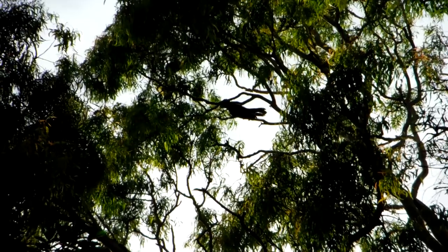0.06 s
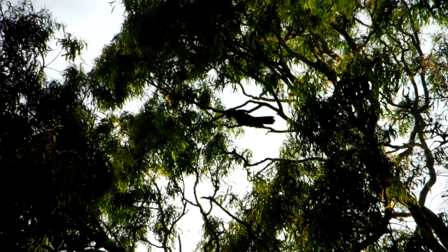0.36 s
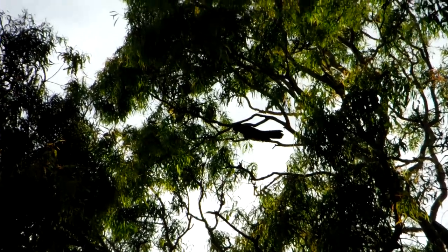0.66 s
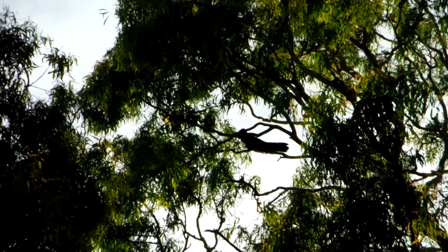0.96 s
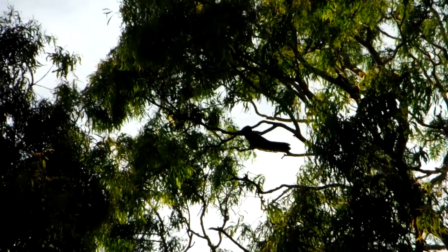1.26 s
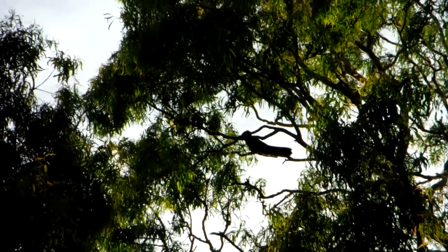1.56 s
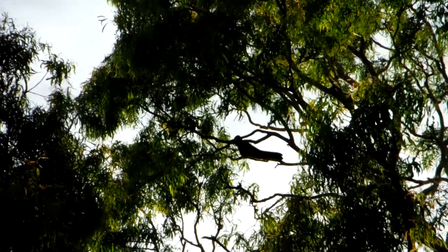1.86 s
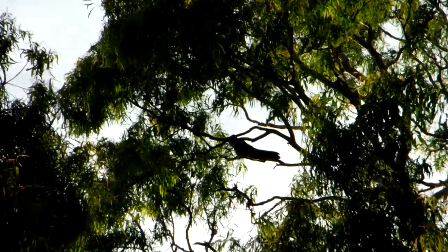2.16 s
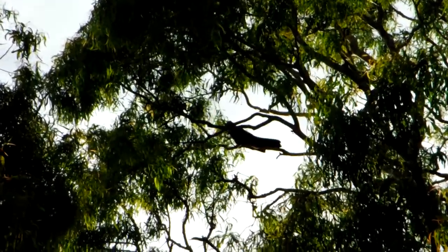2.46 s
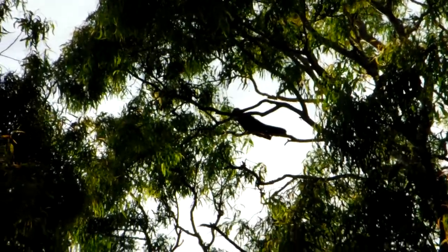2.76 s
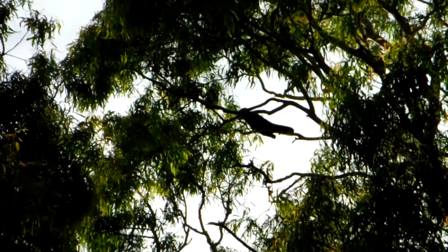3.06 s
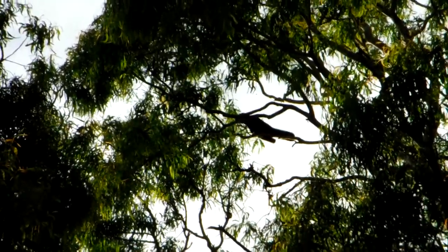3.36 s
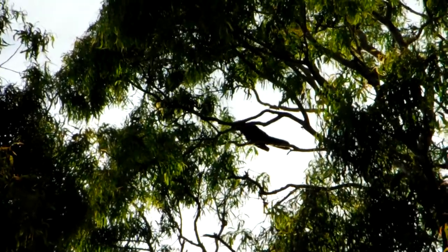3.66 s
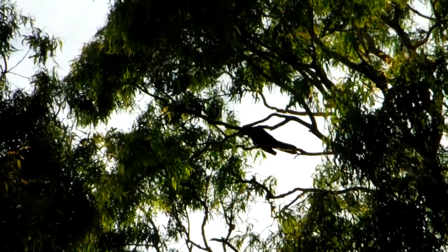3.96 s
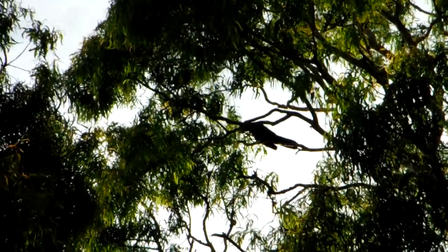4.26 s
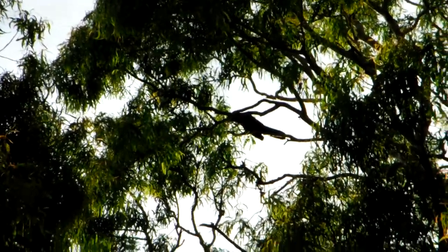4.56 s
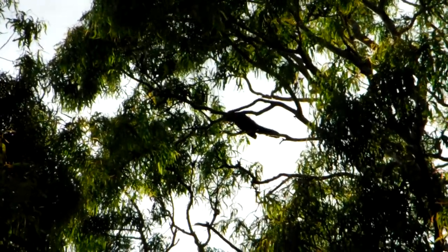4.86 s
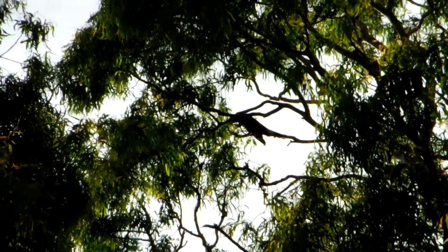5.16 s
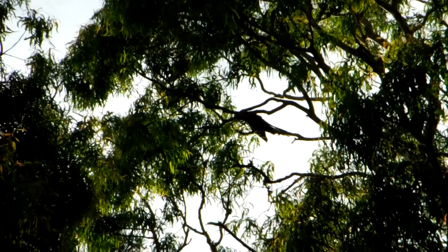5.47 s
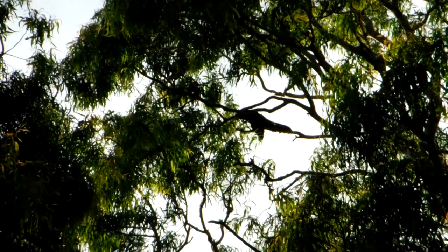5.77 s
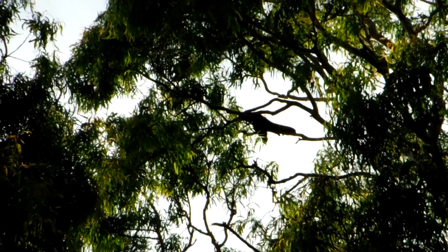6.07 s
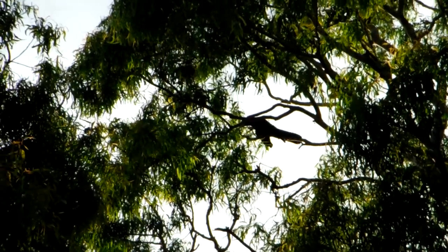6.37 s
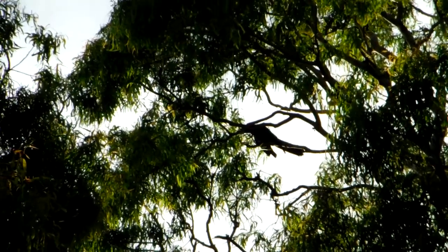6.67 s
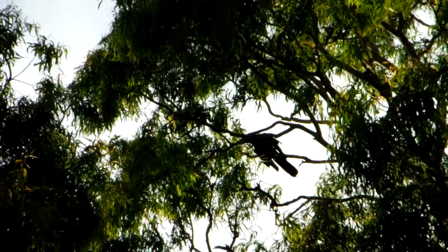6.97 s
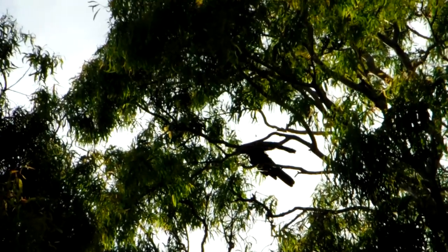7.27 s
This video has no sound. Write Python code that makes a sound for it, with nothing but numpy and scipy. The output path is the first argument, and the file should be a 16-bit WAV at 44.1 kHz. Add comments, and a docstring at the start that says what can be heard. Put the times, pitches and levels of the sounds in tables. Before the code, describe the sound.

Two sharp double clicks, about a second and a half apart, snap right by the microphone and briefly overload it. Light taps and dull handling bumps follow. Up in the trees a cockatoo wheezes thinly several times, and later small birds squeak in quick falling whistles with a slight echo. Leaves hush and a far-off, engine-like rumble throbs steadily throughout.

```python
"""Among trees, a cockatoo wheezes faintly overhead: two thin tones from its syrinx, wrapped in rasp.
Small birds squeak in falling whistles; trunks and leaves echo the calls. Close by, a small hard body
snaps in and back, two double clicks that overload the microphone, with softer taps, ticks and handling
bumps. Under it all: the low rumble of what may be a far engine idling, and the hush of leaves."""
import sys
import numpy as np
from scipy import signal
from scipy.fft import rfft, irfft
from scipy.io import wavfile

SR = 44100
rng = np.random.default_rng(int(sys.argv[2]) if len(sys.argv) > 2 else 0)


def int16_out(signal):
    """Quantize to a 16-bit WAV file."""
    q = np.round(np.clip(np.atleast_2d(signal).T, -1, 1) * 32767)
    wavfile.write(sys.argv[1], SR, q.astype(np.int16))


N = 331416
TIME = np.arange(N) / SR

# Modes of the snapping body. Each row: frequency in Hz, level in dB, t60 in seconds.
BODY_MODES = [(118, -25, 0.12), (234, -13.5, 0.046), (305, -36, 0.06), (384, -17.5, 0.055),
              (559, -22.5, 0.055), (690, -25, 0.03), (958, -4.5, 0.025), (1184, -4, 0.01),
              (1514, -13, 0.025), (2180, -5.5, 0.011), (2390, -4, 0.011), (2842, -0.5, .016),
              (3830, -5.5, 0.012), (4277, -2.5, 0.016), (4562, 0.5, 0.016), (5063, 5, 0.0086),
              (5360, -1, 0.011), (6360, -7, 0.0071), (7030, -13, 0.011), (9100, -9.5, 0.0072),
              (10380, -6.5, 0.0066), (13300, -17, 0.0058), (648, -27.5, 0.13), (1510, -41.5, 0.54),
              (1770, -41, 0.2), (3004, -53, 0.203), (4202, -33, 0.19), (4340, -39, 0.18)]


def gain_of(db):
    """Decibels to amplitude."""
    return 10 ** (np.asarray(db) / 20)


def unit_rms(x):
    """Scale to rms 1."""
    return x / np.sqrt(np.mean(x ** 2) + 1e-20)


def at_hz(points, hz):
    """Interpolate (Hz, value) rows on a log-frequency axis."""
    knots_hz, values = np.transpose(points)
    return np.interp(np.log(hz + 1), np.log(knots_hz + 1), values)


def hump(x, centre, width):
    """Bell curve of height 1."""
    return np.exp(-((x - centre) / width) ** 2)


def add(mix, start_s, sound):
    """Mix a sound in at start_s."""
    part = mix[max(round(start_s * SR), 0):][:len(sound)]
    part += sound[:len(part)]


def noise(spectrum, size=N):
    """Noise of rms 1, shaped by (Hz, dB) rows."""
    shape = gain_of(at_hz(spectrum, np.fft.rfftfreq(size, 1 / SR)))
    return unit_rms(irfft(rfft(rng.standard_normal(size)) * shape, size))


def band(centre_hz, width_hz, size=N):
    """Noise of rms 1 in one resonance; at 0 Hz, a random waver."""
    offset = (np.fft.rfftfreq(size, 1 / SR) - centre_hz) / width_hz
    return unit_rms(irfft(rfft(rng.standard_normal(size)) / (1 + (2 * offset) ** 2), size))


def jittered_phase(hz, jitter, jitter_hz):
    """Phase of a tone that trembles at random; jitter is a share of the pitch."""
    tremble = band(0, jitter_hz, max(len(hz), SR))[:len(hz)]
    return 2 * np.pi * np.cumsum(hz * (1 + jitter * tremble)) / SR


def engine(gain_db=-34.5, db_per_hz=2.5, hum_db=-1.86, rumble_db=-8, waver=0.12, waver_hz=4):
    """A far idle throbs once a cycle over rumble, louder when faster; its orders waver with distance."""
    # Each row: time in seconds, cycle rate in Hz.
    idle_speed = [(0.0, 20.8), (0.63, 20.9), (1.05, 20.3), (1.36, 21.2), (2.74, 20.6), (3.29, 21.0),
                  (4.35, 20.6), (4.83, 21.2), (6.47, 20.4), (6.76, 21.2), (7.22, 20.2), (7.52, 20.2)]
    # Each row: multiple of the cycle rate, relative level in dB.
    orders = [(3, -12), (4, -13), (5, 2), (6, 0.5), (7, -39), (8, -3), (9, -6.5), (10, -13.5), (11, -14.5),
              (13, -19.5)]
    # Each row: frequency in Hz, relative level in dB.
    rumble_spectrum = [(20, -15), (45, -10), (70, -7.5), (115, 3), (190, -0.5), (270, -12), (360, -20),
                       (700, -53.5)]
    lull_db, lull_s, lull_width_s = -5, 4.09, 0.63  # the level sinks once
    lag_rad = 0.121  # higher orders lag, spreading each throb
    rate_hz = np.interp(TIME, *np.transpose(idle_speed))
    phase = 2 * np.pi * np.cumsum(rate_hz) / SR
    level_db = gain_db + db_per_hz * (rate_hz - rate_hz.mean())
    level_db += lull_db * hump(TIME, lull_s, lull_width_s)
    hum = sum(gain_of(db) * (1 + waver * band(0, waver_hz)) * np.sin(k * phase - lag_rad * k ** 2)
              for k, db in orders)
    rumble = gain_of(rumble_db) * noise(rumble_spectrum)
    return gain_of(level_db) * (gain_of(hum_db) * unit_rms(hum) + rumble)


def leaves(level_db=-42, flutter_db=0.37, flutter_hz=11):
    """The hush of leaves, fluttering slightly in level."""
    # Each row: frequency in Hz, relative level in dB.
    leaf_spectrum = [(150, -13.5), (280, -1), (400, -5), (520, -5), (800, -1.5), (1150, -4.5), (1550, -7.5),
                     (2600, -5.5), (3250, -6), (3950, -12.5), (4750, -8), (5500, -17), (6300, -18),
                     (7700, -28.5), (9500, -27.5), (16000, -30)]
    return gain_of(level_db + flutter_db * band(0, flutter_hz)) * noise(leaf_spectrum)


def sizzle(level_db=-66.5, ebb_db=-8, peak_s=1.45, period_s=1.95):
    """A thin high sizzle swells at a steady pace."""
    ebb = np.sin(np.pi * (TIME - peak_s) / period_s) ** 2
    return gain_of(level_db + ebb_db * ebb) * band(centre_hz=9170, width_hz=550)


def whines():
    """Faint trembling tones."""
    # Each row: on and off in seconds, pitch in Hz, jitter as a share, rms level in dB.
    tones = [(3.5, 6.5, 1300, 0.0118, -56.5), (-0.5, 8.5, 7897, .0005, -74)]
    out = np.zeros(N)
    for on_s, off_s, hz, jitter, db in tones:
        fade = np.interp(TIME, [on_s - .2, on_s, off_s, off_s + 0.18], [0, 1, 1, 0])
        phase = jittered_phase(np.full(N, hz), jitter, jitter_hz=42.3)
        out += np.sqrt(2) * gain_of(db) * fade * np.sin(phase)
    return out


def ticks():
    """Short dry bursts of friction."""
    # Each row: start in seconds, level in dB, rise and decay in seconds, centre and width in Hz.
    bursts = [(0.2923, -23, .0002, 0.0017, 3670, 6400), (.376, -32, .012, 0.014, 3570, 4930),
              (0.8158, 2.5, 0.00015, .0013, 3170, 690), (.968, -44.5, 0.0034, 0.008, 6600, 7000),
              (2.370, -23.5, .0002, 0.0015, 3780, 4000), (2.5473, -19, .0003, 0.0018, 4400, 3050),
              (3.802, -35, .004, 0.01, 1070, 200)]
    out, t = np.zeros(N), np.arange(SR // 8) / SR
    for start_s, db, rise_s, decay_s, centre_hz, width_hz in bursts:
        burst = band(centre_hz, width_hz, len(t)) * (1 - np.exp(-t / rise_s)) * np.exp(-t / decay_s)
        burst *= np.sqrt(decay_s * SR / 2) / np.linalg.norm(burst)  # energy of a plain decay from 1
        add(out, start_s, gain_of(db) * burst)
    return out


def strike(weight_db):
    """The body's weighted modes after one blow; neighbours swing in opposite senses."""
    hz, db, t60_s = np.transpose(BODY_MODES)[:, :, None]
    t = np.arange(SR // 2) / SR
    sense = (-1) ** np.arange(len(BODY_MODES))[:, None]
    envelopes = gain_of(db + weight_db[:, None] - 60 * t / t60_s)
    return (sense * envelopes * np.sin(2 * np.pi * hz * t)).sum(0)


def snaps(rattle_s=0.0023, scatter_db=-25, scatter_s=0.015, push_peak=0.26, push_s=0.0016):
    """Each snap pushes the air, rings the body, rattles and scatters off things nearby."""
    # Each row: start in seconds, then force, low thud, hollow knock, mid clack, bright edge,
    # long ring and rattle in dB.
    blows = [(0.6485, 4.5, -11, -1.5, -1.5, -4, -1.5, -5.5), (.8244, 5, -0.5, -8.5, 1.5, -0.5, -4, -6.5),
             (2.1708, 4, -15, 3, -4, -7, -2.5, -6.5), (2.3409, 3, 6, -9, -3.5, 1.5, -2.5, -2)]
    scatter_spectrum = [(40, 0), (220, 6), (700, 9.5), (1800, -0.5), (3300, -12), (4400, 7),
                        (6000, -12), (14000, -39)]
    out, t = np.zeros(N), np.arange(SR // 2) / SR
    hz, _, t60_s = np.transpose(BODY_MODES)
    for start_s, force_db, thud_db, knock_db, clack_db, edge_db, ring_db, rattle_db in blows:
        colour = [(220, thud_db), (930, knock_db), (2600, clack_db), (4200, 0), (5200, edge_db)]
        ring = strike(np.where(t60_s > .1, ring_db, at_hz(colour, hz)))
        rattle = gain_of(rattle_db) * band(1900, 8500, len(t)) * np.exp(-t / rattle_s)
        scatter = gain_of(scatter_db) * noise(scatter_spectrum, len(t)) * np.exp(-t / scatter_s)
        add(out, start_s, gain_of(force_db) * (ring + rattle + scatter))
        # the body starts to give just before it snaps
        add(out, start_s - push_s / 2, push_peak * np.hanning(int(push_s * SR)))
    return out


def cockatoo(build_s=0.08, jitter=0.0112, jitter_hz=220, overtone_db=-23):
    """Each side of the syrinx gives a thin tone, in rasp; pitch and level follow the air pressure."""
    # Each row: start and length in seconds, high tone, low tone and rasp in dB, low tone's top in Hz.
    wheezes = [(0.759, .38, -43, -36.5, -41.5, 2194), (1.679, 0.096, -50, -62, -46, 2110),
               (3.53, .41, -47.5, -43.5, -45, 2035), (5.83, 0.39, -55, -45.5, -46, 2040)]
    # Each row: frequency in Hz, relative level in dB.
    rasp_spectrum = [(1400, -31), (1950, 4.5), (2300, -1), (2700, 5.5), (3300, 5.5), (3850, -9), (4500, 0),
                     (5150, -2), (5650, -9), (6300, -6), (7000, -26), (7800, -43), (12000, -36)]
    high_top_hz, high_sag_hz, low_sag_hz = 4430, 220, 330
    high_fade_db, low_fade_db, rasp_fade_db = -7.5, -27, -17
    out = np.zeros(N)
    for start_s, length_s, high_db, low_db, rasp_db, low_top_hz in wheezes:
        t = np.arange(0, length_s, 1 / SR)
        slack = np.interp(t, [0, min(build_s, length_s / 2), length_s], [1, 0, 1])  # 0 at full pressure
        high_phase = jittered_phase(high_top_hz - high_sag_hz * slack, jitter, jitter_hz)
        low_phase = jittered_phase(low_top_hz - low_sag_hz * slack, 2 * jitter, jitter_hz)
        high = np.sin(high_phase) + gain_of(overtone_db) * np.sin(2 * high_phase)
        high *= gain_of(high_db + high_fade_db * slack ** 2)
        low = gain_of(low_db + low_fade_db * slack) * np.sin(low_phase)
        rasp = gain_of(rasp_db + rasp_fade_db * slack ** 3) * noise(rasp_spectrum, SR)[:len(t)]
        call = np.sqrt(2) * (high + low) + rasp
        add(out, start_s, call * signal.windows.tukey(len(t), .1))
    return out


def forest_echo(calls, onset_s=0.005):
    """Trunks and leaves scatter the calls into a soft tail."""
    # Each row: frequency in Hz, t60 in seconds.
    decay_times = [(200, .4), (1500, 1), (3000, 0.86), (6000, 0.98), (12000, .2)]
    hz, t, spectra = signal.stft(rng.standard_normal(SR), SR, nperseg=256)
    decay = gain_of(-60 * t / at_hz(decay_times, hz)[:, None])
    tail = signal.istft(spectra * decay, SR, nperseg=256)[1]
    tail *= 1 - np.exp(-np.arange(len(tail)) / SR / onset_s)
    return signal.fftconvolve(calls, tail / np.linalg.norm(tail))[:N]


def whistle(length_s, pitches_hz, db, catch_db=0, jitter=.012, jitter_hz=400, db_per_octave=10):
    """A glide through three pitches, weaker when lower; catch_db dips it where the voice breaks."""
    progress = np.linspace(0, 1, int(length_s * SR))
    hz = np.polyval(np.polyfit([0, .5, 1], pitches_hz, 2), progress)
    catch = hump(progress, centre=0.42, width=0.085)
    level = gain_of(db + db_per_octave * np.log2(hz / hz.max()) + catch_db * catch)
    return level * signal.windows.tukey(len(hz), .25) * np.sin(jittered_phase(hz, jitter, jitter_hz))


def small_birds(chirp_s=0.0434, chirp_hz=(2994, 2686, 2520), fall_hz=(3820, 3090, 2550)):
    """Single whistles, and two-note squeaks: a scratchy chirp, then a breaking fall."""
    # Each row: start and length in seconds, first, middle and last pitch in Hz, level in dB.
    single_notes = [(1.201, 0.038, 3040, 3160, 2900, -36.5), (4.817, 0.099, 3000, 2816, 2780, -39.5),
                    (6.467, 0.052, 2525, 2210, 1870, -39), (7.341, 0.051, 1764, 2310, 2320, -34.5),
                    (7.389, 0.056, 2385, 1945, 1630, -37.5), (7.462, .03, 3010, 2680, 2400, -40)]
    # Each row: fall's start and length in seconds, its level in dB, chirp's lead in seconds, level in dB.
    squeaks = [(5.118, 0.11, -29.5, .062, -40), (6.016, 0.087, -31, 0.07, -36),
               (6.94, .088, -31, .051, -37.5)]
    out = np.zeros(N)
    for start_s, length_s, *pitches_hz, db in single_notes:
        add(out, start_s, whistle(length_s, pitches_hz, db))
    for start_s, length_s, fall_db, lead_s, chirp_db in squeaks:
        add(out, start_s - lead_s, whistle(chirp_s, chirp_hz, chirp_db, jitter=0.031))
        add(out, start_s, whistle(length_s, fall_hz, fall_db, catch_db=-10))
    return out


def bumps():
    """Handling the microphone gives a few slow swings of pressure per bump."""
    # Each row: centre in seconds, level in dB, frequency in Hz, length in seconds.
    swings = [(1.288, -31, 90.5, 0.068), (1.539, -27, 125, .07), (1.839, -33, 75, 0.076),
              (3.46, -34, 90, 0.067), (5.19, -25.5, 107, 0.0684), (5.614, -34, 83, .07),
              (5.652, -30, 230, 0.0323)]
    out = np.zeros(N)
    for centre_s, db, hz, length_s in swings:
        t = np.arange(0, length_s, 1 / SR)
        add(out, centre_s - length_s / 2, gain_of(db) * np.hanning(len(t)) * np.sin(2 * np.pi * hz * t))
    return out


def taps(damping_per_s=220):
    """A soft contact reaches only the body's low modes, and damps them."""
    # Each row: start in seconds, force in dB, cutoff in Hz.
    contacts = [(1.8236, -10, 1290), (1.944, -12, 1500), (2.137, -11.5, 1850), (2.314, -11.5, 1580),
                (3.4635, -16.5, 1100), (3.804, -22, 1200), (4.16, -22, 1400), (5.649, -15, 380)]
    out, hz = np.zeros(N), np.transpose(BODY_MODES)[0]
    for start_s, force_db, cutoff_hz in contacts:
        ring = strike(weight_db=-10 * np.log10(1 + (hz / cutoff_hz) ** 6))
        damping = np.exp(-damping_per_s * np.arange(len(ring)) / SR)
        add(out, start_s, gain_of(force_db) * ring * damping)
    return out


def scene(wheeze_wet_db=-10, whistle_wet_db=-6):
    """Far birds with their echo, near clicks and the background, in mono."""
    wheezes, whistles = cockatoo(), small_birds()
    echo = forest_echo(gain_of(wheeze_wet_db) * wheezes + gain_of(whistle_wet_db) * whistles)
    near = snaps() + taps() + ticks() + bumps()
    background = engine() + leaves() + sizzle() + whines()
    return (wheezes + whistles + echo + near + background)[None]


def record(dry, cutoff_hz=16300):
    """The snaps clip at full scale; a low-pass follows."""
    lowpass = signal.firwin(255, cutoff_hz, window=("kaiser", 8), fs=SR)
    return signal.oaconvolve(np.clip(dry, -1, 1), lowpass[None], "same")


dry = scene()
out = record(dry)
int16_out(out)
```